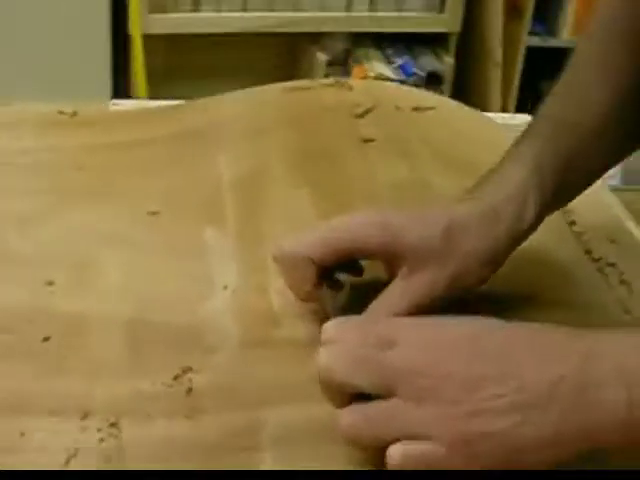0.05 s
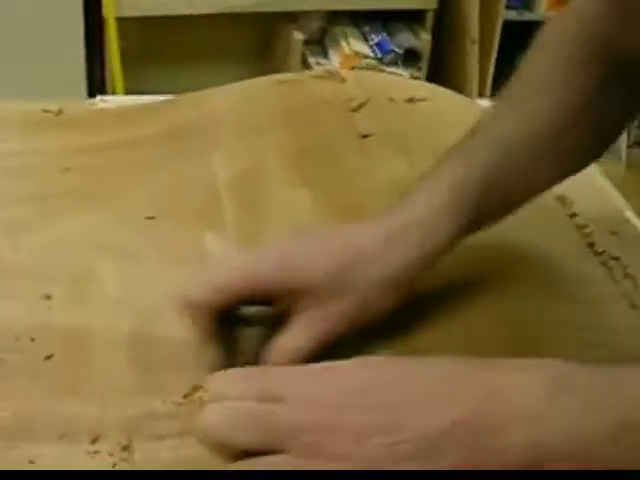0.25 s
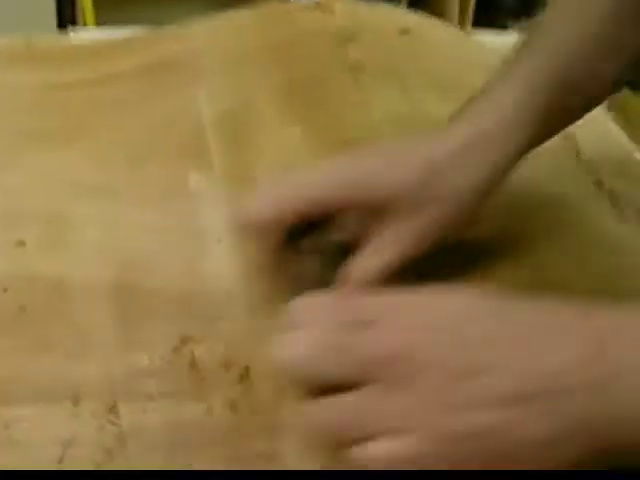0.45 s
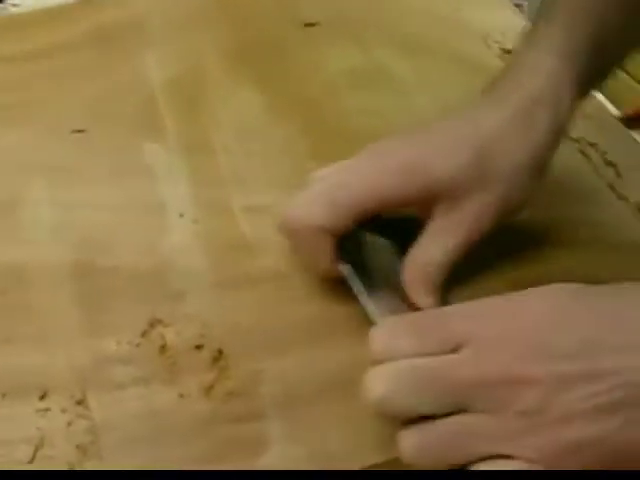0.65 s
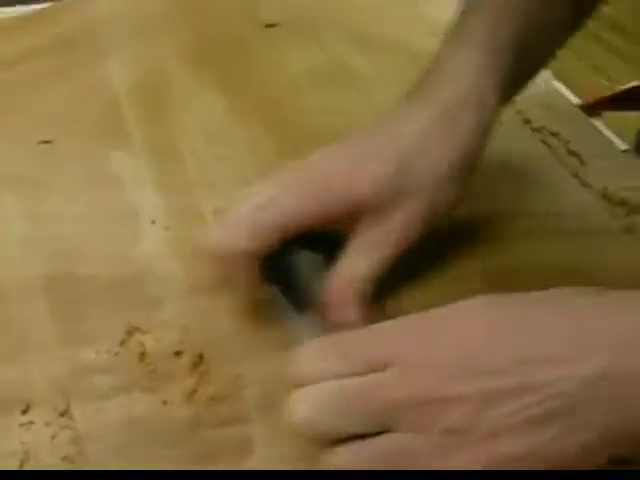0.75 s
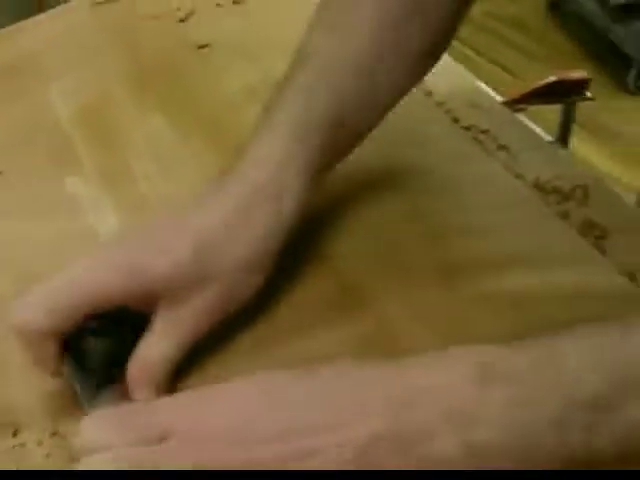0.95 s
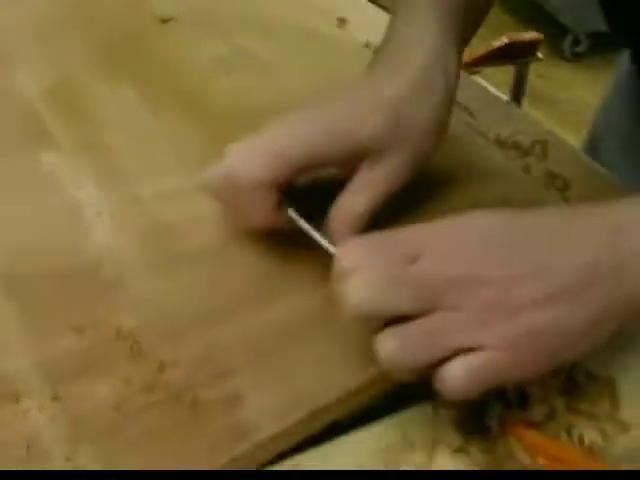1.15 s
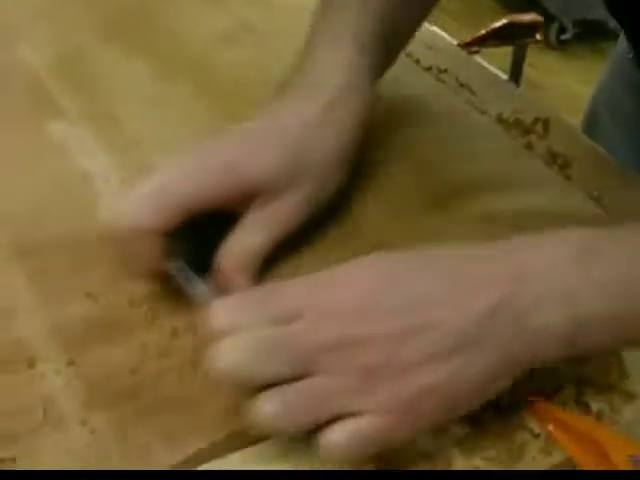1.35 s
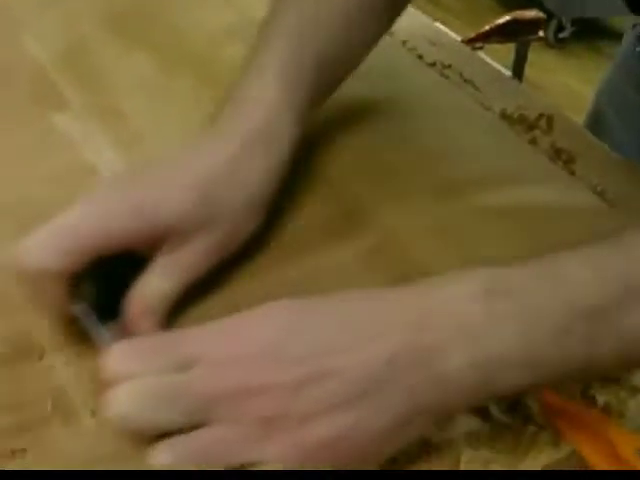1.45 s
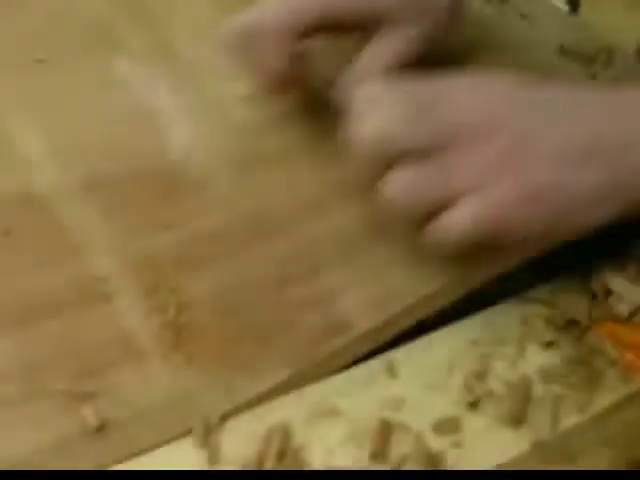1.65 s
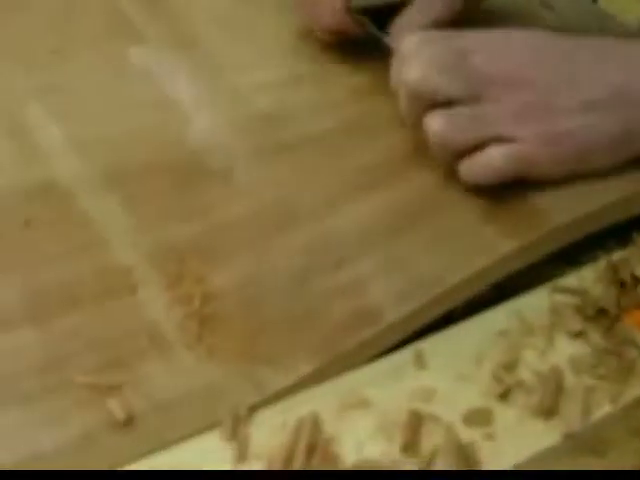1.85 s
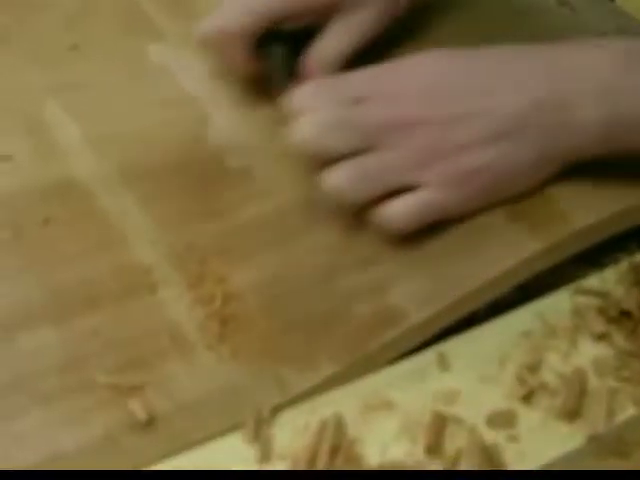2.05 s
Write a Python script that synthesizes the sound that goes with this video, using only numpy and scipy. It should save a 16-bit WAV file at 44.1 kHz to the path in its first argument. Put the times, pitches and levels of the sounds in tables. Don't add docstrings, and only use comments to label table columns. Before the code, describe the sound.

A steel hand scraper cuts four dense, gritty strokes on a hollow wooden panel, the last longest; sharp knocks clatter between most of them. Close, thin, nearly mono sound with little bass in a quiet workshop.

```python
import sys
import numpy as np
from scipy import signal
from scipy.fft import rfft, irfft, next_fast_len
from scipy.io import wavfile
from scipy.ndimage import uniform_filter1d, map_coordinates

SR = 44100
rng = np.random.default_rng(int(sys.argv[2]) if len(sys.argv) > 2 else 0)


def field_ratio(decibels):
    return 10 ** (np.asarray(decibels, dtype=float) / 20)


def bounce(signal):
    frames = np.transpose(np.atleast_2d(signal))
    limited = np.clip(frames, -1, 1)
    pcm = np.round(limited * 32767).astype(np.int16)
    wavfile.write(sys.argv[1], SR, pcm)


N = 92874

# (frequency [Hz], density [dB per Hz])
SHOP_AIR = [(18, -54), (30, -24), (144, -1.5), (304, -5.5), (3070, -15.5), (4070, -19.5), (4630, -19.5),
            (12300, -27.5), (14000, -55)]
SHOP_AIR_DB = -44.5
# (frequency [Hz], density [dB per Hz])
RUMBLE = [(20, 0), (60, -9.5), (100, -12), (200, -9), (300, -44)]
RUMBLE_DB = -68
# (time [s], rise [s], length [s], level [dB], sag [dB per s])
CUTS = [
    (0.056, 0.03, 0.2, -19.5, 24.5),
    (0.627, 0.029, 0.24, -20, 14.5),
    (1.12, 0.037, 0.29, -19, 14.5),
    (1.849, 0.056, 0.41, -20.5, -4.5),
]
# (time [s], rise [s], length [s], level [dB], sag [dB per s])
DRAGS = [(0.0395, .002, 0.011, -34, 200), (0.049, 0.026, 0.024, -30, 0), (0.2673, .01, 0.045, -32, 30),
         (0.494, 0.022, 0.044, -42.5, 19), (0.5494, 0.016, 0.087, -30, -14),
         (.883, 0.0064, 0.041, -31.5, 152), (1.738, 0.028, 0.099, -24, 146),
         (1.432, 0.0069, 0.064, -36.5, 150), (1.05, 0.0085, 0.062, -39, 100),
         (1.715, 0.0037, 0.029, -37, 10), (1.9, 0.044, 0.048, -49, 5), (1.1, 0.021, 0.025, -39, 5)]
CUT_LIFT_S, DRAG_LIFT_S = 0.0085, 0.0074
# (frequency [Hz], density [dB per Hz])
TEAR = [(200, -26.5), (300, -26), (450, -36), (1250, -18), (2000, -17), (3600, -18), (6500, -18.5),
        (13500, -18)]
# (frequency [Hz], density [dB per Hz])
RUB = [(120, -44), (200, -6.5), (312, -7.5), (541, -19), (3630, -11.5), (5460, -21), (12600, -22),
       (14000, -30)]
# (frequency [Hz], width [Hz], level [dB])
PANEL_MODES = [(310.8, 22.2, -1.5), (523, 33, -10), (736.7, 45, -6), (966, 70, -5), (1480, 81, -8)]
# (frequency [Hz], width [Hz], level [dB])
BLADE_MODES = [(2288, 63, -15.5), (2600, 60, -15), (3025, 73, -14), (3593, 146, -10), (4162, 116, -8.5),
               (4776, 100, -13.5), (5900, 230, -17)]
# a row where it starts, a row where it ends (level [dB] a mode)
CUT_SHAKE = [
    [(1, -13, -5.5, 5.5, -3), (1.5, -7.5, -8, -5.5, -1)],
    [(-1.5, -10.5, -7.5, -4.5, -5), (-2.6, 5, -0.5, -8.5, -6)],
    [(-0.28, -2, 0.9, -8, -7), (-2.4, -3, 4.3, -7, -10)],
    [(-4.5, -5, -3.5, -0.5, -3.5), (3, -8.5, -8, -6.5, -5)],
]
CUT_FLEX = [
    (-0.13, 2.5, 4.5, 2.8, 4.5, 2, 3),
    (1, -2, 2, -1.4, -2.5, -1, -1),
    (-1, -2.5, -4, 0.64, -3, -2, -6),
    (0.11, -1, -1, 0, 0.5, 1, -9),
]
CUT_PANEL_DB, CUT_BLADE_DB = -6, -6.5
DRAG_SHAKE = [-0.5, -5.5, -8.5, -3, -3]
DRAG_BLADE_DB = -8
DRIFT_DB, PATCH_DB = 1.5, 1.5
GRAIN_DB, FLUTTER_DB = 1, 0.58
# (time [s], peak level [dB], contact [ms], rattle [s])
BLOWS = [
    [(.293, -21, 0.32, .004), (.2985, -14, .12, 0.003), (.3015, -13, 0.33, .002), (.3052, -6, 0.36, 0.002),
     (.3075, -3.5, 0.17, 0.0018), (.3115, -8.5, 0.26, 0.0024), (.3165, -15.5, 0.5, 0.004),
     (.3205, -17.5, .3, .004), (.327, -19, 0.34, .004), (.341, -15.5, 0.47, 0.0087), (.348, -20, .4, .008)],
    [(1.04, -19.5, 0.55, 0.01), (1.0522, -9.5, 0.087, 0.003), (1.055, -10.5, 0.11, .003),
     (1.0581, -6, 0.26, 0.003), (1.0612, -6.5, 0.36, .003), (1.0645, -11.5, 0.48, 0.0037),
     (1.0705, -9, 0.28, .004), (1.081, -10, 0.74, 0.005), (1.088, -8, 0.59, .004),
     (1.0945, -11.5, 0.3, .004), (1.0985, -17, .3, .005)],
    [(1.681, -30, 0.36, 0.01), (1.688, -32, .36, .006), (1.696, -25, 0.31, 0.006), (1.704, -17, .2, .005),
     (1.7115, 0, 0.085, .001), (1.7138, -8, 0.15, 0.00093), (1.7162, -9, 0.49, .002),
     (1.752, -15, 0.48, 0.009)],
    [(.0625, -27, 2.8, .003), (.0685, -16, 3.3, 0.003), (.075, -20.5, 3.3, .003), (1.008, -27, 1.5, 0.01)],
]
# (frequency [Hz], level [dB], t60 [s])
SPOT_MODES = [
    [(293.4, -6, 0.11), (556, -8.5, 0.04), (697, -8, 0.076), (903, -0.5, 0.052), (1248, 1, 0.032),
     (1475, 3.5, 0.023), (1807, -6, 0.06), (3100, -16, .02), (3660, -6, 0.022), (4670, -20, .02)],
    [(320, 2, 0.14), (542, -1, 0.063), (650.5, -5.5, 0.2), (765, 0, 0.069), (988, 1, 0.077),
     (1190, -6, .04), (1316, -4, 0.061), (1640, -16, .08), (1890, -10, .04), (2330, -5, .04),
     (3000, 0, 0.039), (4150, -11, .015)],
    [(297, -1.5, 0.055), (538, -4, 0.059), (867, 3, 0.023), (1127, 6, 0.042), (1340, -5, 0.028),
     (1610, -14, 0.033), (2270, -6.5, 0.028), (2500, -5.5, .02), (3050, -8, 0.025), (3650, -7, 0.019),
     (4220, -7, 0.015), (4760, -13, 0.018), (5820, -15.5, 0.012)],
    [(304, 3, 0.059), (494, -19, 0.041)],
]
# (frequency [Hz], level [dB], t60 [s])
DENSE_MODES = [(254, -18, 0.11), (600, 1, 0.14), (1390, 5, 0.068), (1890, -3, 0.077), (2300, -4, 0.057),
               (4800, -11.5, 0.035), (7000, -29, 0.027), (13000, -22, 0.018)]
DENSE_DB = [-5, -1, -6, -40]
RATTLE_DB = -4.5
# (time [s], peak level [dB], frequency [Hz], width [Hz], length [s])
TICKS = [(0.389, -36.5, 8100, 2500, 0.0066), (0.431, -32.5, 3680, 500, 0.013),
         (0.438, -36, 9050, 2000, 0.0047), (0.449, -39, 10800, 3000, 0.0043),
         (0.463, -40, 10400, 4000, 0.013), (0.502, -40.5, 4170, 500, .006),
         (0.508, -39.5, 6600, 600, 0.013), (0.53, -40, 12000, 4000, .003)]
# (time [s], peak level [dB], frequency [Hz], width [Hz], length [s])
SINGING = [
    (1.59, -50, 3120, 54, .11),
    (1.562, -50.5, 5100, 150, 0.17),
]
# (frequency [Hz], level [dB], t60 [s])
SHOP_ECHO = [(300, 0, 0.48), (1000, 0, 0.51), (3000, 0, 0.22), (10000, 0, 0.26)]
SHOP_ECHO_DB = -12.5
# (frequency [Hz], side over mid [dB])
WIDTH = [(60, -27), (250, -54), (1000, -42), (2000, -33), (4200, -20), (7700, -17.5), (11000, -6.5),
         (14000, 0.5)]
# (frequency [Hz], left over right [dB])
LEAN = [(5000, 0), (8000, -0.8), (12000, 1.2)]
TURNED = 0.4
BASS_CUT_HZ, TOP_HZ, EDGE_HZ = 286.7, 13620, 60


def unit(x):
    return x / np.sqrt(np.mean(x ** 2) + 1e-20)


def along(points, hz):
    f, v = np.transpose(points)
    return np.interp(np.log(hz + 1), np.log(f + 1), v)


def wobble(rate):
    knots = rng.standard_normal(int(N * rate / SR) + 4)
    return map_coordinates(knots, [np.arange(N) * rate / SR])


def filtered(x, response):
    m = next_fast_len(N + SR // 2)
    return irfft(rfft(x, m) * response(np.fft.rfftfreq(m, 1 / SR)), m)[..., :N]


def shaped(x, points):
    return filtered(x, lambda hz: field_ratio(along(points, hz)))


def peak(centre_hz, width_hz):
    return lambda f: 1j * f * width_hz / (centre_hz ** 2 - f * f + 1j * f * width_hz)


def dying(rows):
    rows = np.array(rows)
    hz, t, z = signal.stft(rng.standard_normal(SR // 2), SR, nperseg=256)
    db = along(rows[:, [0, 1]], hz)[:, None]
    t60 = along(rows[:, [0, 2]], hz)[:, None]
    h = signal.istft(z * field_ratio(db - 60 * t / t60), SR, nperseg=256)[1][:SR // 2]
    return h / np.linalg.norm(h)


def shop_air():
    return field_ratio(SHOP_AIR_DB) * unit(shaped(rng.standard_normal(N), SHOP_AIR))


def circuit_rumble():
    return field_ratio(RUMBLE_DB + 1.7 * wobble(11.4)) * unit(shaped(rng.standard_normal(N), RUMBLE))


def stroke(start, rise, length, db, sag_db, lift):
    t = np.arange(N) / SR - start
    bite = np.sin(np.pi / 2 * np.clip(t / rise, 0, 1)) ** 2
    hold = field_ratio(db - sag_db * np.clip(t - rise, 0, 1))
    return bite * hold * np.exp(-np.clip(t - length, 0, 1) / lift)


def fibres():
    unevenness_db = GRAIN_DB * wobble(900) + FLUTTER_DB * wobble(39.96)
    return unit(rng.standard_normal(N) * field_ratio(unevenness_db))


def patchy(x):
    z = signal.stft(x, nperseg=256)[2]
    field = uniform_filter1d(rng.standard_normal(z.shape), size=5, axis=0)
    field = uniform_filter1d(field, size=12, axis=1)
    return unit(signal.istft(z * field_ratio(PATCH_DB * unit(field)), nperseg=256)[1][:N])


def body(modes):
    rows = []
    for hz, width, db in modes:
        ringing = unit(filtered(fibres(), peak(hz, width)))
        rows.append(field_ratio(db + DRIFT_DB * wobble(8.87)) * ringing)
    rows = np.array(rows)
    return rows / np.std(rows.sum(axis=0))


def scraping():
    panel, blade = body(PANEL_MODES), body(BLADE_MODES)
    tear = patchy(shaped(fibres(), TEAR))
    rub = patchy(shaped(fibres(), RUB))
    cuts = 0
    for row, (first_db, last_db), steel_db in zip(CUTS, np.array(CUT_SHAKE), CUT_FLEX):
        start, length = row[0], row[2]
        travel = np.clip((np.arange(N) / SR - start) / length, 0, 1)
        shake_db = first_db[:, None] + (last_db - first_db)[:, None] * travel
        wood = (field_ratio(CUT_PANEL_DB + shake_db) * panel).sum(axis=0)
        steel = field_ratio(CUT_BLADE_DB + np.array(steel_db)) @ blade
        cuts = cuts + stroke(*row, CUT_LIFT_S) * (tear + wood + steel)
    drag = sum(stroke(*row, DRAG_LIFT_S) for row in DRAGS)
    light = rub + field_ratio(np.array(DRAG_SHAKE)) @ panel + field_ratio(DRAG_BLADE_DB) * blade.sum(axis=0)
    return cuts + drag * light


def shop_echo(x):
    return field_ratio(SHOP_ECHO_DB) * signal.fftconvolve(x, dying(SHOP_ECHO))[:N]


def knocks():
    out = np.zeros(N + SR)
    t = np.arange(SR // 2) / SR
    for blows, modes, dense_db in zip(BLOWS, SPOT_MODES, DENSE_DB):
        ring = sum(field_ratio(db - 60 * t / t60) * np.sin(2 * np.pi * hz * t) for hz, db, t60 in modes)
        ring = ring / np.linalg.norm(ring)
        for s, db, contact_ms, rattle in blows:
            wood = ring + field_ratio(dense_db) * dying(DENSE_MODES)
            chatter = np.gradient(rng.standard_normal(len(t))) * np.exp(-t / rattle)
            chatter *= field_ratio(RATTLE_DB) / np.sqrt(rattle * SR / 20)
            chatter[0] += 1
            push = t * np.exp(-t / (contact_ms * 0.00014))
            force = signal.fftconvolve(chatter, push)[:len(t)]
            hit = signal.fftconvolve(force, wood)[:len(t)]
            out[round(s * SR):][:len(t)] += field_ratio(db) * hit / np.abs(hit).max()
    return out[:N]


def narrow_swells(events):
    t = np.arange(N) / SR
    out = 0
    for s, db, hz, width, length in events:
        swell = np.sin(np.pi * np.clip((t - s) / length, 0, 1))
        band = filtered(rng.standard_normal(N), lambda f: peak(hz, width)(f) ** 2)
        out = out + field_ratio(db - 3.5) * swell * unit(band)
    return out


def ticks():
    return narrow_swells(TICKS)


def blade_singing():
    return narrow_swells(SINGING)


def stray(x):
    z = signal.stft(x, nperseg=256)[2]
    turns = np.exp(2j * np.pi * rng.random(z.shape))
    y = signal.istft(np.abs(z) * turns, nperseg=256)[1][:N]
    return unit(y) * np.std(x)


def two_ports(mid):
    earlier = filtered(mid, lambda hz: 1j + 0 * hz)
    side = np.sqrt(TURNED) * earlier + np.sqrt(1 - TURNED) * stray(mid)
    side = shaped(side, WIDTH)
    halves = np.array([[.5], [-.5]])
    return filtered(np.array([mid + side, mid - side]), lambda hz: field_ratio(along(LEAN, hz) * halves))


def scene():
    work = scraping() + knocks() + ticks() + blade_singing()
    return two_ports(work + shop_echo(work) + shop_air())


def low_pass(x):
    return signal.sosfilt(signal.butter(12, 14740, fs=SR, output="sos"), x)


def record(dry):
    def band(f):
        s = 1j * f / BASS_CUT_HZ
        bass_cut = (s ** 2 / (s ** 2 + .9 * s + 1)) ** 3
        return bass_cut * np.clip((TOP_HZ - f) / EDGE_HZ / 2 + .5, 0, 1) ** 2

    x = filtered(dry, band) + circuit_rumble()
    mix = x / (1 + np.abs(x) ** 6) ** (1 / 6)
    return low_pass(mix)


dry = scene()
out = record(dry)
bounce(out)
```